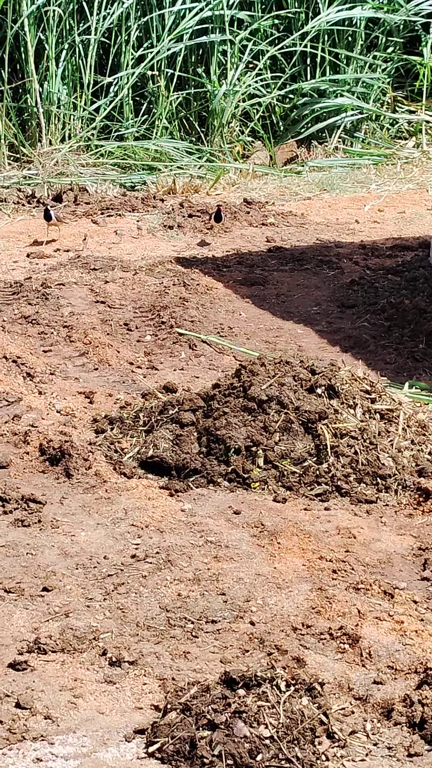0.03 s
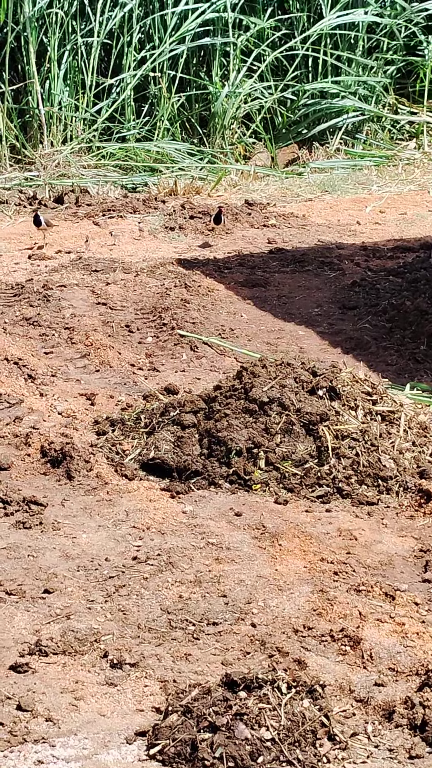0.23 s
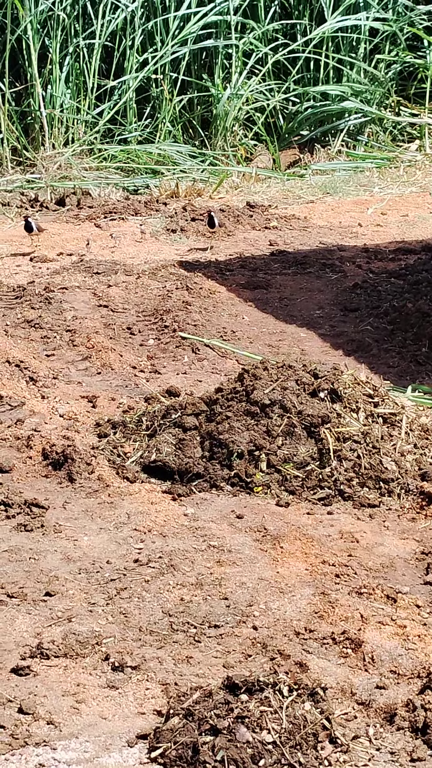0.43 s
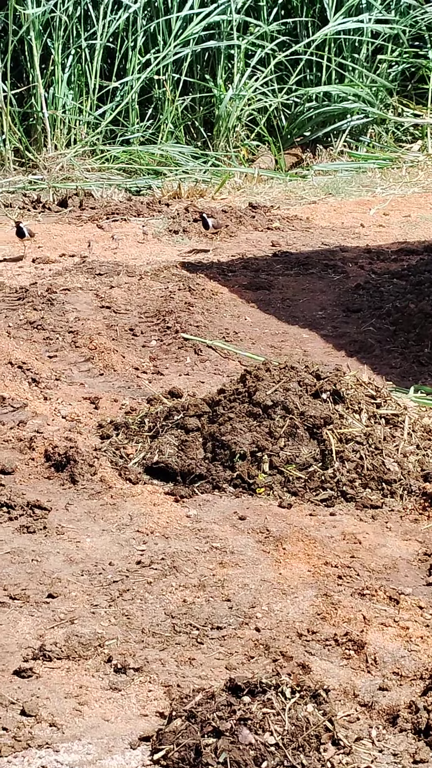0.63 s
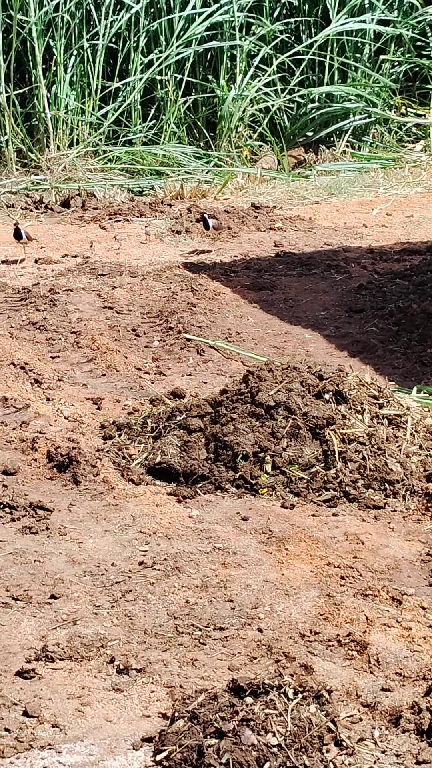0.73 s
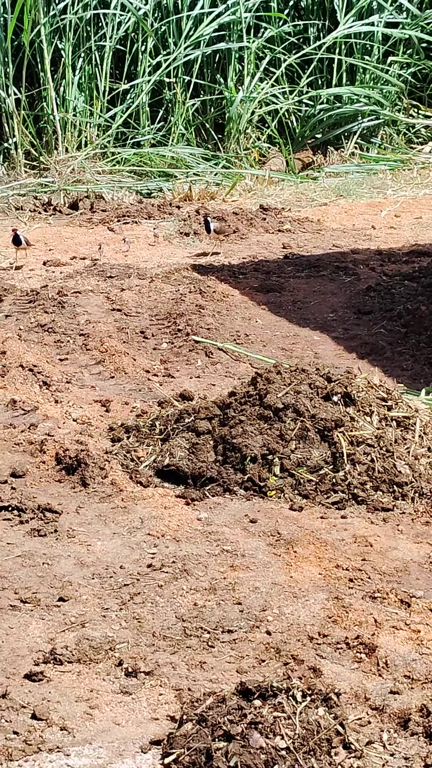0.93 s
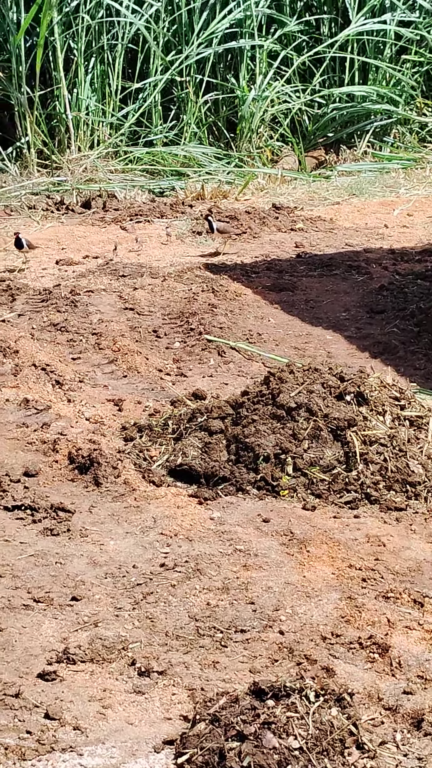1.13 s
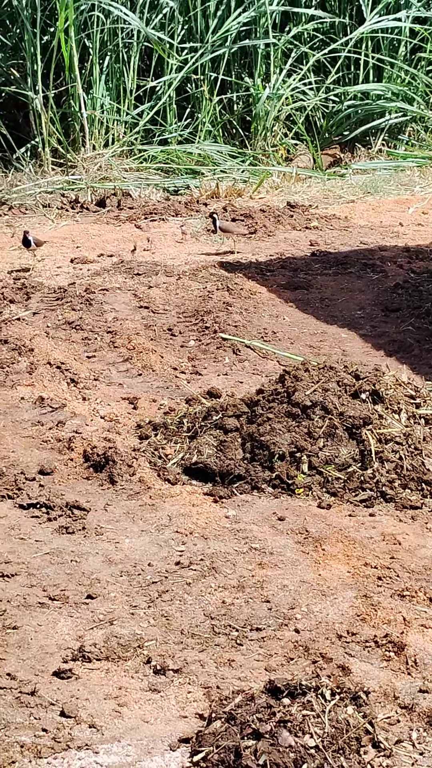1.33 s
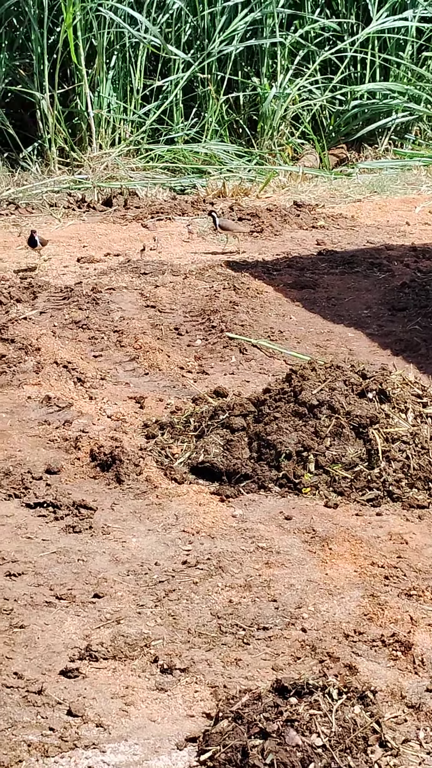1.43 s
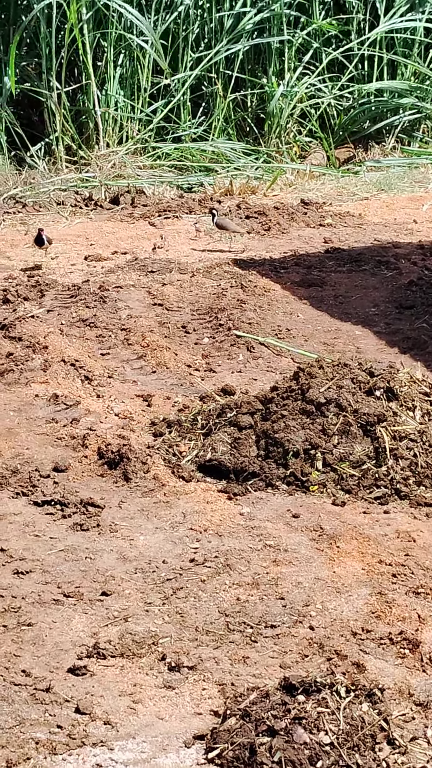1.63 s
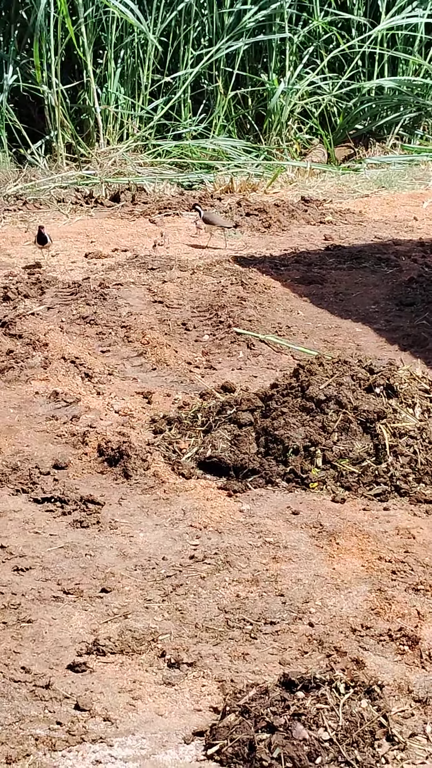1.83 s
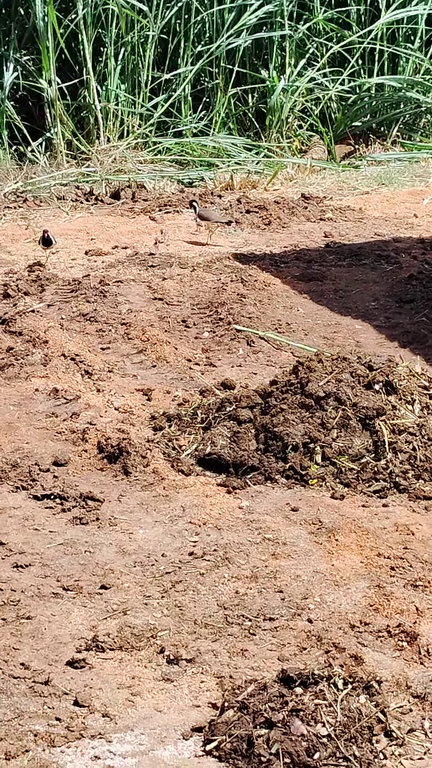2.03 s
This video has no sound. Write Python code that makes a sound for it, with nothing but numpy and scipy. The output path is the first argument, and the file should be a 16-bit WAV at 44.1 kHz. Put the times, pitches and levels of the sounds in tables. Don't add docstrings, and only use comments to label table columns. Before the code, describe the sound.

Sharp bird chirps in loose clusters, one longer wavering call, over a soft steady outdoor wash.

```python
import sys
import numpy as np
from scipy import signal
from scipy.fft import rfft, irfft, next_fast_len
from scipy.io import wavfile

SR = 44100
rng = np.random.default_rng(int(sys.argv[2]) if len(sys.argv) > 2 else 0)


def to_wav(sig):
    pcm = np.clip(np.atleast_2d(sig), -1, 1) * 32767
    pcm = np.round(pcm).astype(np.int16)
    wavfile.write(sys.argv[1], SR, pcm.T)


def gain_from_db(level_db):
    decades = np.asarray(level_db, float) / 20
    return 10 ** decades


N = 92036
TOP_HZ = 15400
LEFT_RIGHT = np.array([[.5], [-.5]])


def rms_one(x):
    return x / np.sqrt(np.mean(x ** 2) + 1e-20)


def at_hz(points, hz):
    table_hz, value = np.array(points).T
    return np.interp(np.log(hz), np.log(table_hz), value)


def drift(rate):
    r = np.exp(-40 * np.pi * rate / SR)
    steps = rng.standard_normal(N // 20 + 3002)
    slow = signal.lfilter([1], [1, -2 * r, r * r], steps)[3000:]
    return np.interp(np.arange(N) / 20, np.arange(len(slow)), rms_one(slow))


def filtered(x, gain):
    size = next_fast_len(N + SR // 2)
    hz = np.maximum(np.arange(size // 2 + 1) * SR / size, 1)
    return irfft(rfft(x, size) * gain(hz), size)[..., :N]


# frequency in Hz, strength in dB per Hz.
FLOOR_COLOUR = [(30, -13.5), (130, -6.5), (280, -3), (620, -12), (1300, -9.5), (3000, -16.5), (5300, -18),
                (15500, -44)]
# frequency in Hz, left minus right in dB.
FLOOR_BALANCE = [(60, 2.5), (240, 0), (950, -4.0), (3770, -5), (15000, 5)]
# frequency in Hz, likeness (1 is identical).
LIKENESS = [(40, .4), (110, .72), (290, .92), (640, .88), (1400, .6), (4000, .3), (12000, .1)]


def floor():
    level_db, lag_s, lag_from_hz = -47, .0002, 1370
    out, together = np.zeros((2, N)), drift(.5)
    edges = 22 * 2 ** np.arange(0, 9.6, .5)
    white = rng.standard_normal((2, 2, N))
    for k, (low, high) in enumerate(zip(edges, edges[1:])):
        band = signal.butter(2, [low, high], "band", fs=SR, output="sos")
        mid, side = signal.sosfilt(band, white[k % 2])
        hz = np.sqrt(low * high)
        alike = np.clip(at_hz(LIKENESS, hz), -1, 1)
        flicker_db = .5 * together + 2.24 * drift(2.75)
        gain = gain_from_db(at_hz(FLOOR_COLOUR, hz) + flicker_db) * gain_from_db(at_hz(FLOOR_BALANCE, hz) * LEFT_RIGHT)
        out += gain * (np.sqrt(1 + alike) * mid + np.sqrt(1 - alike) * side * [[1], [-1]])

    def lag(hz):
        delay_s = lag_s / (1 + (lag_from_hz / hz) ** 2)
        return np.exp(-2j * np.pi * hz * delay_s)

    out[1] = filtered(out[1], lag)
    return gain_from_db(level_db) * rms_one(out)


def hum():
    hum_hz, width_hz, level_db = 490, 5, -59
    tone = filtered(rng.standard_normal(N), lambda hz: 1 / (1 + ((hz - hum_hz) / width_hz * 2) ** 2))
    return gain_from_db(level_db) * rms_one(tone)


# centre in seconds, peak in dB, pitch in Hz, length in seconds.
BUMPS = [
    (.203, -43, 62, .012),
    (1.278, -46, 175, .025),
    (1.152, -45, 1300, .003),
]


def wind():
    level_db, eases_db_per_s, rumble_hz = -58.5, 16, 75.6
    t = np.arange(N) / SR
    rumble = filtered(rng.standard_normal((2, N)),
                      lambda hz: 1 / (1 + (hz / rumble_hz) ** 4) / (1 + (18 / hz) ** 2))
    strength = gain_from_db(level_db - eases_db_per_s * t + 2.2 * drift(9.2))
    out = rms_one(rumble) * [[.8], [1.2]] * strength
    for s, db, hz, length in BUMPS:
        swell = np.exp(-((t - s) / length) ** 2)
        out = out - gain_from_db(db) * swell * np.cos(2 * np.pi * hz * (t - s))
    return out


# centre in seconds, level in dB, length in seconds.
GUSTS = [
    (1.16, -51, 0.021),
    (1.626, -49, 0.066),
    (2.075, -57, 0.042),
]


def leaves():
    leaf_hz, width_hz = 1330, 550
    t = np.arange(N) / SR
    rustle = filtered(rng.standard_normal((2, N)),
                      lambda hz: 1 / (1 + ((hz - leaf_hz) / width_hz * 2) ** 2))
    stir = sum(gain_from_db(db) * np.exp(-((t - s) / length) ** 2) for s, db, length in GUSTS)
    return rms_one(rustle) * [[.7], [1.3]] * stir


# delay in seconds, left level in dB, right level in dB.
ECHOES = [
    (.0021, -6.5, -17),
    (.008, -2, -12.5),
    (.019, -40, -25),
    (.029, -11.5, -26),
    (.043, -25, -26),
    (.062, -31, -22),
]
# frequency in Hz, left minus right in dB.
BIRD_BALANCE = [(1000, -5), (2400, -7.5), (3600, -3), (5200, -7), (6300, -1), (9000, 0), (15000, -2)]
# frequency in Hz, how far the left leads in radians of phase.
BIRD_LEAD = [(1000, .6), (2400, 1.9), (3800, 3.4), (5100, 5.8), (6300, 8.5), (8350, 11.7), (10000, 15.1),
             (14000, 18.5)]


def field(x):
    haze_db, haze_t60_s, echo_cut_hz = -13, .18, 15000
    t = np.arange(SR // 2) / SR
    haze = rng.standard_normal((2, len(t))) * gain_from_db(-60 * t / haze_t60_s) * np.clip(t / .021, 0, 1)
    haze = gain_from_db(haze_db) * haze / np.sqrt(np.sum(haze ** 2, axis=1))[:, None]

    def paths(hz):
        size = 2 * len(hz) - 2
        back = rfft(haze, size)
        for delay, left_db, right_db in ECHOES:
            back = back + gain_from_db([[left_db], [right_db]]) * np.exp(-2j * np.pi * hz * delay)
        back = back / (1 + 1j * hz / echo_cut_hz)
        balance = gain_from_db(LEFT_RIGHT * at_hz(BIRD_BALANCE, hz))
        lead = np.interp(hz, *np.transpose(BIRD_LEAD))
        return (1 + back) * balance * np.exp(-1j * lead * (.5 - LEFT_RIGHT))

    return filtered(x, paths)


# frequency in Hz, strength in dB.
THROAT = [(1100, -28), (1900, 2), (2400, 5.5), (3600, 4.5), (5200, 2), (7000, -4.5), (9800, -20.5),
          (14500, -30)]


def voice(hz, level, bright_db, count=13):
    odd_db, fifth_db, shimmer_db = -2, -7, 1.5
    phase_bend = .404
    phase = 2 * np.pi * np.cumsum(hz) / SR
    out, shimmer = 0, drift(62)
    starts = rng.integers(0, N - len(hz), count)
    for k, start in zip(range(1, count + 1), starts):
        db = at_hz(THROAT, k * hz) + odd_db * (k % 2) + fifth_db * (k == 5)
        db = db + bright_db * np.log2(np.clip(k, 2, 7) / 2) / 2
        db = db + shimmer_db * np.sqrt(k - 1) / 2 * shimmer[start:start + len(hz)]
        out = out + gain_from_db(db) * (k * hz < TOP_HZ) * np.cos(k * phase + phase_bend * k * k)
    return level * out


JITTER = .0056
ATTACK_S = .0008

# time in seconds, pitch in Hz, level in dB, brightness in dB.
LONG_CALL = [
    (.679, 1168, -28.5, 3),
    (0.702, 1142, -35.5, -17),
    (0.724, 1106, -31, 11),
    (0.754, 1083, -35, -38),
    (0.774, 1078, -40, -14),
    (0.792, 986, -42, -13),
    (.804, 984, -38.5, -18),
    (0.823, 1041, -41, -13),
    (0.863, 1055, -54, -33),
]


def long_call():
    base_bright_db, waver_db = -8.5, 4.5
    s, hz, db, bright_db = np.transpose(LONG_CALL)
    out, part = np.zeros(N), slice(int(s[0] * SR), int((s[-1] + .018) * SR))
    t = np.arange(N)[part] / SR
    shape = np.clip((t - s[0]) / ATTACK_S, 0, 1) * np.clip((t[-1] - t) / .024, 0, 1)
    pitch = np.interp(t, s, hz) * (1 + JITTER * drift(110)[part])
    bright = base_bright_db + np.interp(t, s, bright_db)
    level = shape * gain_from_db(np.interp(t, s, db) + waver_db * drift(60)[part])
    out[part] = voice(pitch, level, bright)
    return out


# start in seconds, length in seconds, starting pitch in Hz, level in dB, brightness in dB.
CHIRPS = [
    (.5047, .0075, 1185, -39, -2),
    (.5325, .0325, 1210, -35, -4),
    (.7015, .029, 1385, -30, 1),
    (1.0275, .0245, 1372, -30, 3),
    (1.6475, .026, 1255, -31.5, 2),
    (1.7195, .029, 1228, -36, -6),
    (1.9066, .0195, 1085, -40.5, -5),
]


def chirps():
    sag_share, sag_power, swell_db = .088, 2.4, 2
    release_s, close_s, fade_db, bright_fade_db = .002, .0015, 8, 11
    rasp_db, rasp_s, rasp_hz = -13.5, .007, 3020
    out, t = np.zeros(N), np.arange(N) / SR
    wobble, waver = drift(140), drift(90)
    air = rms_one(filtered(rng.standard_normal(N),
                           lambda hz: 1 / (1 + (rasp_hz / hz) ** 4) / (1 + (hz / 9000) ** 2)))
    for s, length, hz, db, bright_db in CHIRPS:
        part = slice(int(s * SR), int((s + 2 * length + .02) * SR))
        age = np.maximum(t[part] - s, 0)
        u = age / length
        end_s = (.5 + np.clip(.5 - .82 * (db + 26.5), 0, 1)) * length
        shape = np.clip(age / ATTACK_S, 0, 1) * np.exp(-np.maximum(age - end_s, 0) / release_s)
        effort_db = db + swell_db * np.minimum(u, 1) ** 3 - fade_db * np.clip((age - length) / close_s, 0, 1)
        pitch = hz * (1 - sag_share * np.minimum(u, 1.5) ** sag_power + JITTER * wobble[part])
        bright = bright_db - bright_fade_db * u ** 2
        out[part] += voice(pitch, shape * gain_from_db(effort_db + waver[part]), bright)
        out[part] += shape * gain_from_db(db + rasp_db + bright_db) * np.exp(-age / rasp_s) * air[part]
    return out


def scene():
    long_pan_db = .5
    birds = field(chirps()) + field(long_call()) * gain_from_db(long_pan_db * LEFT_RIGHT)
    return birds + floor() + hum() + wind() + leaves()


def band_limit(x):
    return signal.sosfilt(signal.butter(12, 15690, fs=SR, output="sos"), x)


def record(dry):
    treble_hz, lead_s, gap_hz, gap_share = 5950, .0048, 300, .25

    def split(hz):
        high = 1 / (1 + (treble_hz / hz) ** 40)
        joined = 1 - high + high * np.exp(2j * np.pi * hz * lead_s)
        dip = 1 - gap_share * np.exp(-((hz - treble_hz) / gap_hz) ** 2)
        return joined * (hz < TOP_HZ) * dip

    return band_limit(filtered(dry, split))


dry = scene()
out = record(dry)
to_wav(out)
```